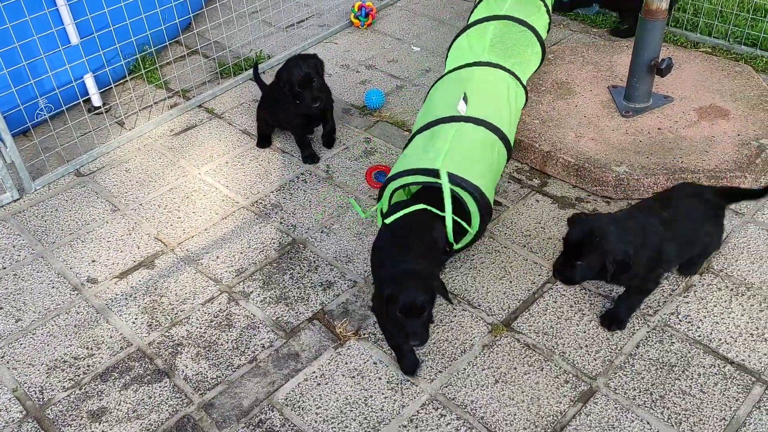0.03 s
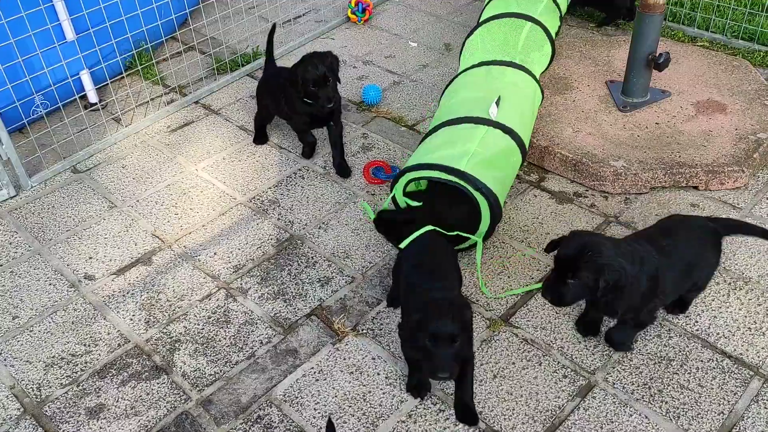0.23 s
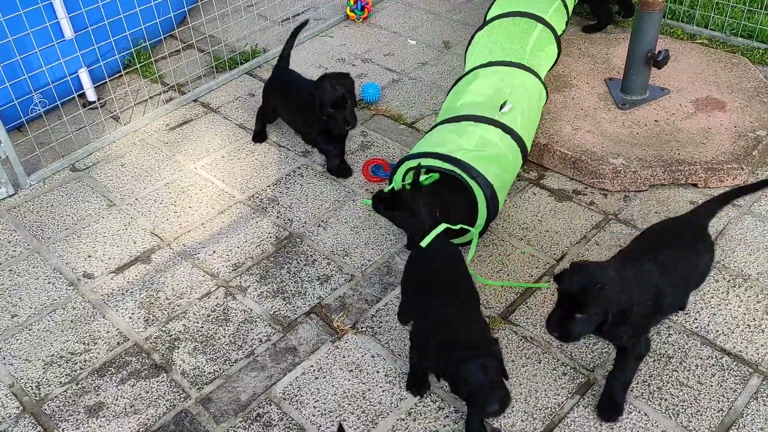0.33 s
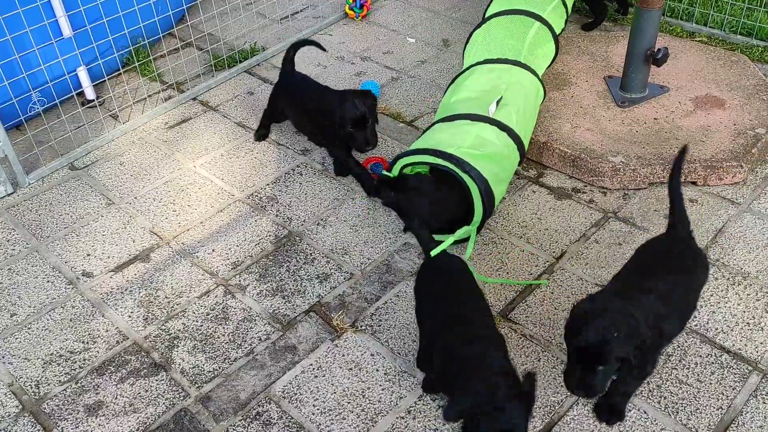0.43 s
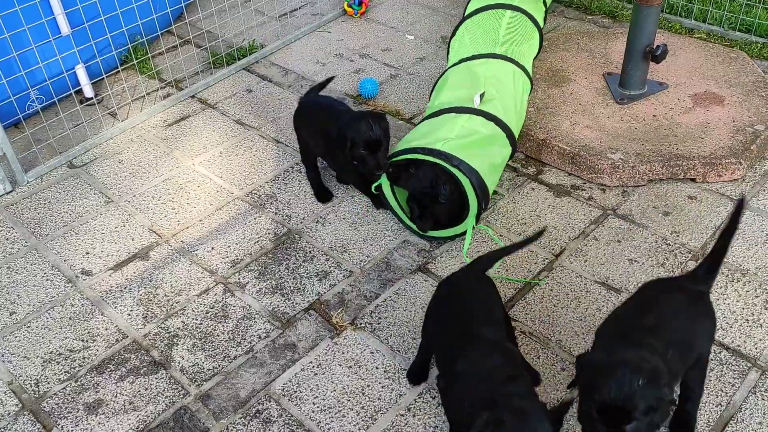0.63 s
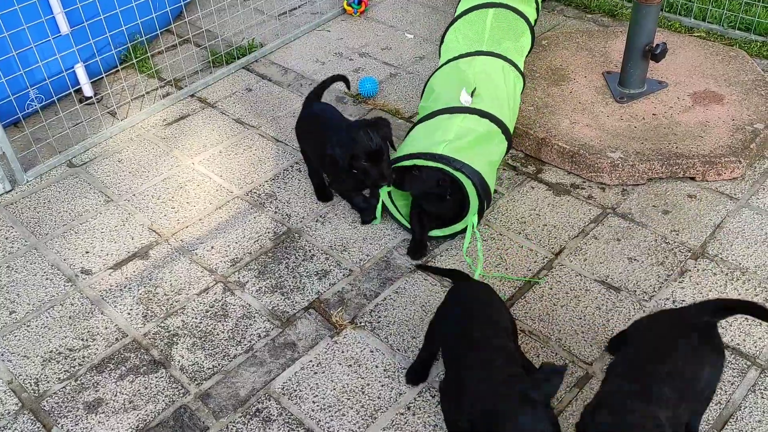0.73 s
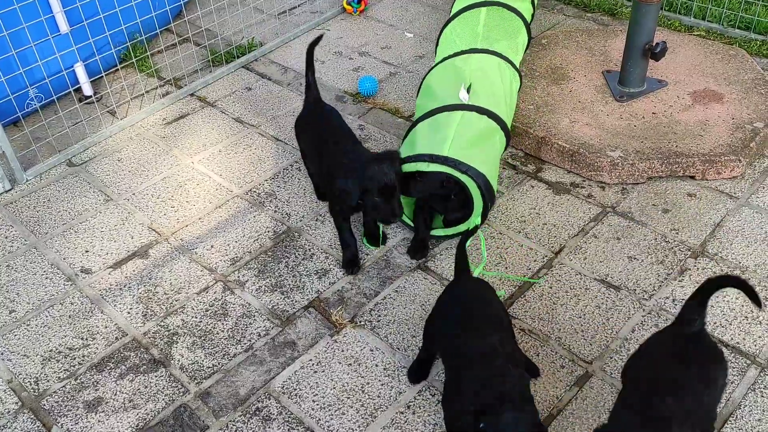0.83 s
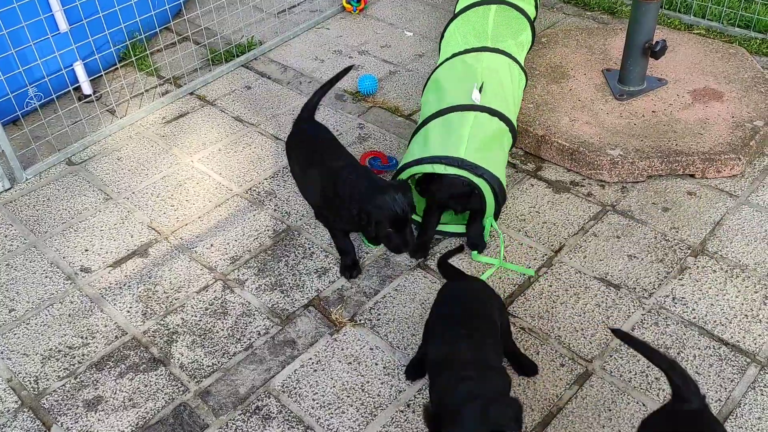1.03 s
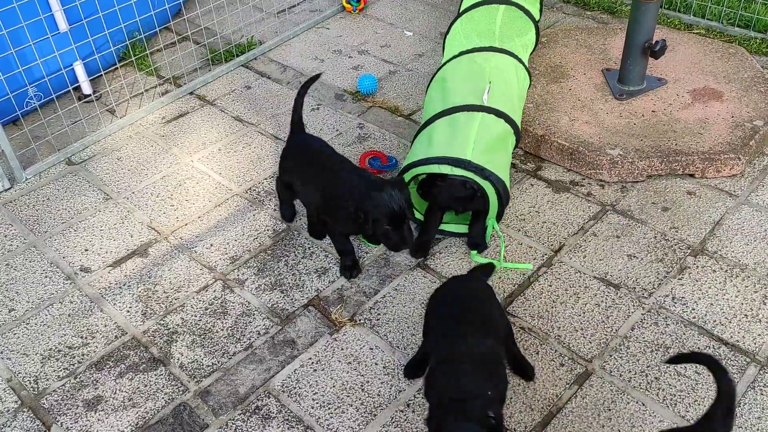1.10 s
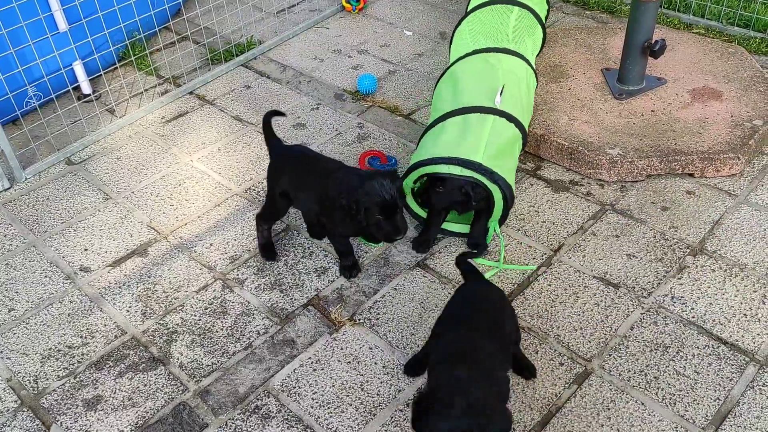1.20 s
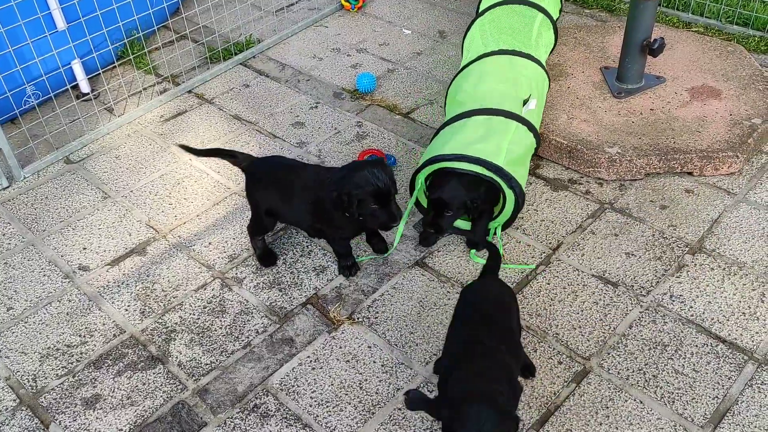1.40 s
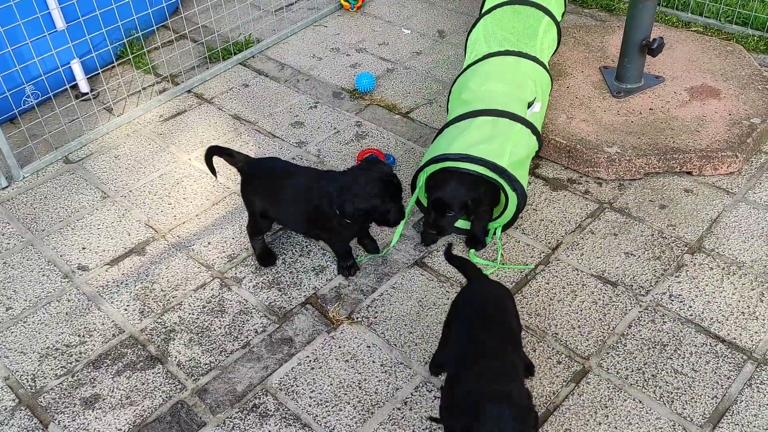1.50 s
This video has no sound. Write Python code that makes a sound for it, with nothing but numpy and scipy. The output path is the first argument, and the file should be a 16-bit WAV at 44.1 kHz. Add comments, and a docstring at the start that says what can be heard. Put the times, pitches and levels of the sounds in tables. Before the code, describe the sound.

A fabric play tunnel rustles close by as puppies scramble out, with hollow thumps around 0.2 to 0.3 seconds. The loudest bumps, crinkles and sharp snaps come between 0.5 and 0.7 seconds, followed by claw scratches and a brief rubbing groan near 0.8. From about 0.9, soft knocks and light wind touch the microphone on the right, while paws scuff the paving more quietly. Faint outdoor rumble and hiss continue throughout.

```python
"""A springy fabric play tunnel, with puppies scrambling out of it, close by on a paved patio.
Their bumps thump the taut wall, knock its hoops and set the air in the tube ringing; the stiff cloth
crinkles, snaps and groans. Paws scuff and cloth rustles throughout, over faint far-off rumble and hiss.
Light wind and a few soft knocks reach the two ports of the stereo microphone."""
import sys
import numpy as np
from scipy import signal
from scipy.fft import rfft, irfft, next_fast_len
from scipy.io import wavfile
from scipy.ndimage import uniform_filter1d, map_coordinates

SR = 44100
rng = np.random.default_rng(int(sys.argv[2]) if len(sys.argv) > 2 else 0)


def wrap_up_sound(samples):
    """Save the sound to the file named by the first command line argument, as 16-bit audio."""
    columns = np.atleast_2d(samples).T
    # keep every value between -1 and 1, then stretch to whole-number steps
    tamed = np.clip(columns, -1, 1)
    steps = np.round(tamed * 32767).astype(np.int16)
    wavfile.write(sys.argv[1], SR, steps)


N = 68355
T = np.arange(N) / SR

# distant outdoor rumble and hiss: freq_hz, level_db
AIR_SPECTRUM = [(25, -1.5), (60, 3), (160, -5.5), (300, -6), (700, -24.5), (1500, -35), (4000, -22.5),
                (6000, -30), (7800, -52), (9200, -54), (10200, -51), (15000, -63)]
# its stereo width: freq_hz, side_db
AIR_WIDTH = [(40, -21), (250, -25), (1000, 4.5), (8000, 3)]
# wind on the microphone ports: time_s, left_db, right_db
WIND_GUSTS = [(0, -51, -54.5), (.27, -51, -32), (.42, -72, -52.5), (.7, -63, -41.5), (.98, -42.5, -33.5),
              (1.05, -61, -26), (1.13, -54, -30.5), (1.23, -46.5, -44.5), (1.32, -61, -40),
              (1.42, -50, -39.5), (1.48, -37, -38.5), (1.55, -50, -32.5)]
# wind rumble: freq_hz, level_db
WIND_SPECTRUM = [(15, 2), (40, -3.5), (70, -6), (130, -10), (250, -14.5), (600, -45), (2000, -77)]
# soft knocks beside the right port: start_s, level_db, pitch_hz, decay_s
MIC_KNOCKS = [(0.914, -17.5, 207, 0.0063), (1.012, -28.5, 138, 0.0058), (1.034, -13.5, 160, 0.0055),
              (1.05, -27, 42.5, 0.072), (1.22, -25.5, 56.4, 0.023), (1.223, -41, 228, 0.014)]
# how the ports differ in colour: freq_hz, left_minus_right_db
PORT_COLOUR = [(500, 3.5), (1400, 0), (2600, -1), (3600, 1), (4500, 1), (7400, -1), (8200, 2.5),
               (9000, 9.5), (9800, -1), (11500, -1.5), (14500, 0)]

# stereo width of cloth and paws: freq_hz, side_db
PLAY_WIDTH = [(150, -11), (450, -27), (800, -9.5), (1500, 1.5), (4000, -5), (8000, -2), (14000, 3)]
# running rustle of paws and cloth: time_s, level_db
RUSTLE_CURVE = [(0, -42.5), (.06, -49.5), (.14, -45.5), (.23, -42.5), (.38, -44), (.43, -46.5), (.512, -45),
                (.62, -47), (.73, -50), (.79, -40), (.87, -48.5), (.96, -42.5), (1.05, -45.5), (1.11, -55),
                (1.2, -48.5), (1.32, -51), (1.38, -48), (1.49, -50.5), (1.55, -56)]
# rustle colour: freq_hz, level_db
RUSTLE_SPECTRUM = [(200, -10.5), (700, 3.5), (1300, -6), (2500, -8), (4000, -11), (5500, -7), (7000, 3.5),
                   (8000, 4.5), (9200, -6), (10200, -22), (14000, -27), (16000, -30)]
# a paw scuffs the paving: start_s, level_db, attack_s, decay_s
PAW_SCUFFS = [(0.119, -48.5, 0.0024, 0.045), (0.498, -40.5, 0.02, 0.16), (0.551, -30.5, .005, 0.016),
              (0.660, -46, 0.0075, 0.068), (0.926, -42.5, 0.018, 0.061), (1.063, -40.5, 0.012, 0.033),
              (1.088, -38, 0.0016, 0.023), (1.154, -54, 0.0032, 0.017), (1.181, -54, 0.0024, 0.0049),
              (1.21, -58.5, 0.0043, 0.04), (1.236, -47.5, 0.014, 0.039), (1.346, -46, 0.013, 0.12),
              (1.444, -47, 0.0069, 0.022), (1.473, -44, 0.017, 0.012)]
# grit under a paw: freq_hz, level_db
SCUFF_SPECTRUM = [(200, 5), (500, -2.5), (800, 5.5), (1150, 0.5), (1800, -6), (2700, -3), (4000, -9.5),
                  (7500, -1.5), (10500, -41)]
# a paw taps something hard: start_s, level_db, pitch_hz, decay_s
PAW_TAPS = [(1.154, -41, 1085, 0.0063)]
# a claw scratches the cloth: start_s, level_db, decay_s
CLAW_SCRATCHES = [(0.6921, -21.5, 0.0057), (0.695, -26, 0.0033), (0.7704, -29, 0.0034),
                  (1.241, -39.5, 0.0046)]
# zip of the weave: freq_hz, level_db
SCRATCH_SPECTRUM = [(1000, -11.5), (3800, -27), (4700, 2), (5400, 2), (6300, 12.5), (7100, -6), (8000, 8.5),
                    (9300, -14.5), (11000, -28), (15000, -41)]

# a flank rubs along the wall: start_s, level_db, attack_s, decay_s, pitch_hz, glide_hz_per_s
FLANK_RUBS = [(0.734, -35.5, 0.014, 0.054, 375, 1298), (0.777, -30, 0.0016, 0.014, 560, -2),
              (0.806, -27.5, 0.0098, 0.0055, 452, 5), (0.823, -28.5, 0.003, 0.019, 465.8, -600),
              (0.869, -41, 0.0056, 0.0084, 445, -2), (0.918, -38, 0.023, 0.032, 450, 11),
              (1.392, -49.5, 0.033, 0.031, 684, -150)]
# rasp of fur on the wall: freq_hz, level_db
RASP_SPECTRUM = [(120, -21), (220, -2), (310, 7.5), (450, -3.5), (550, 1.5), (620, -11), (720, 2),
                 (950, -21), (1350, -12), (2500, -30), (5000, -75), (10000, -98)]
# the stiff cloth buckles: start_s, level_db, attack_s, decay_s
CLOTH_CRINKLES = [(0.186, -39.5, 0.00074, 0.01), (0.456, -39.5, 0.0015, 0.011), (0.517, -33, 0.0013, 0.015),
                  (0.5397, -24.5, 0.0029, 0.019), (0.5507, -19, 0.0088, 0.0069),
                  (0.561, -24, 0.0033, 0.0063), (0.573, -34, 0.014, 0.012), (0.607, -16.5, 0.0044, 0.006),
                  (0.6251, -25, 0.00082, 0.00077), (0.666, -34.5, 0.0016, 0.011),
                  (0.826, -33.5, 0.0015, 0.0091), (0.899, -37, 0.00075, 0.0096),
                  (1.091, -33.5, 0.0025, 0.023)]
# buckling clicks: freq_hz, level_db
CRINKLE_SPECTRUM = [(500, -7.5), (1500, -12), (2700, -7.5), (3500, -16.5), (4600, -5.5), (6200, -1),
                    (7800, 5), (9000, -5.5), (10300, -22), (11500, -27.5), (14000, -29), (16000, -47)]
# a crease snaps: start_s, level_db, ping_hz, left_minus_right_db
CREASE_SNAPS = [(0.187, -30.5, 7800, 5), (0.517, -31.5, 7500, 8), (0.544, -24, 8000, 11),
                (0.5467, -17, 7100, 1), (0.5568, -14, 6070, 5), (0.5616, -8.5, 7640, 0),
                (0.5638, -15, 7500, 2), (0.6089, -15, 6200, -3), (0.6141, -8, 6930, -2.5),
                (0.616, -14, 9030, -2), (0.6678, -24.5, 6960, -3), (0.6736, -22.5, 7300, 2.5),
                (0.6928, -30.5, 5360, -6), (0.7707, -28.5, 5400, 7), (0.9, -31, 8100, 3),
                (1.059, -37, 7500, 1.5)]
# a spring hoop is knocked: start_s, level_db, pitch_hz, decay_s
HOOP_HITS = [(0.210, -44, 797, 0.01), (0.226, -30, 749, 0.0099), (0.304, -23.5, 696, 0.011),
             (0.590, -20.5, 716, 0.017), (0.652, -36, 648, 0.025), (0.682, -38, 673, 0.0079),
             (0.834, -32.5, 704, 0.021), (1.094, -29.5, 689, 0.01), (1.098, -37, 791, 0.019),
             (1.448, -45, 697, 0.01)]
# modes of a hoop: pitch_ratio, level_db, decay_ratio
HOOP_MODES = [(0.692, -9.5, 1.1), (0.998, -0.5, 1), (1.179, -7, .6), (1.5, -18, 1.1), (1.84, -15, .7)]
# air modes of the tube: pitch_hz, level_db, t60_s (capped in tube_air)
TUBE_MODES = [(183, 4.5, 0.13), (209.4, 1.5, 0.32), (296, -4, 0.1), (340.2, 3, 0.27), (418, -5.5, 0.28),
              (493, -17, 0.23), (656, 5, 0.15), (700, -9, 0.39), (1020, -6, 0.27)]
# a body bumps the wall: start_s, thump_db, pitch_hz, overtone_re_thump_db, flap_db, decay_s
WALL_BUMPS = [(0.12, -34.5, 249.6, -28, -44, 0.012), (0.208, -26.5, 299, -10, -35, 0.008),
              (0.221, -30.5, 270, 2.5, -31, 0.0085), (0.236, -28.5, 237.4, -6, -37.5, 0.012),
              (0.295, -31, 210, -16, -30.5, 0.015), (0.302, -23.5, 219.5, -12, -41, 0.019),
              (0.346, -37.5, 202.2, 2, -67, 0.024), (0.458, -40, 294.5, -13.5, -41.5, 0.02),
              (0.494, -24, 309, -28, -37, 0.0087), (0.577, -21.5, 292.4, -14, -21, 0.017),
              (0.587, -22.5, 308, -6, -22.5, 0.011), (0.593, -35.5, 215, -14, -53, 0.018),
              (0.64, -26.5, 307, -29, -41, 0.016), (0.651, -41.5, 178, -20, -61, 0.019),
              (0.687, -41.5, 322.7, 0, -61, 0.022), (0.776, -34, 282, 10, -30.5, 0.012),
              (1.030, -41, 344, -15, -47, 0.011), (1.102, -35.5, 322, -13, -35, 0.011),
              (1.205, -45, 230, -1, -47, 0.0085), (1.357, -38, 181, -8.5, -66, 0.0036)]
# dull flap of shaken cloth: freq_hz, level_db
FLAP_SPECTRUM = [(100, -20.5), (170, -6.5), (260, 2), (430, 3.5), (560, -1), (740, -2), (1000, -8.5),
                 (1400, -10), (2200, -17.5), (3500, -19.5), (7000, -24), (11000, -71)]

WALL_PAN_DB = 1.5  # the wall sits slightly left


def from_db(db):
    """Decibels to gain."""
    return 10 ** (np.asarray(db) / 20)


def rms_one(x):
    """Scale to rms 1."""
    return x / np.sqrt(np.mean(x ** 2) + 1e-20)


def in_time(rows):
    """Join the rows of a curve by straight lines."""
    times, *columns = np.transpose(rows)
    return np.array([np.interp(T, times, column) for column in columns])


def pan(db):
    """Left and right gains for a left-minus-right level."""
    return from_db(np.array([[db], [-db]]) / 2)


def colour(x, spectrum, keep_power=True):
    """Causal (minimum-phase) filter through (freq_hz, level_db) points."""
    size = 2 * next_fast_len(N)
    hz, db = np.transpose(spectrum)
    bin_hz = np.arange(size // 2 + 1) * SR / size
    gain = from_db(np.interp(np.log(bin_hz + 1), np.log(hz), db))
    cepstrum = irfft(np.log(rms_one(gain) if keep_power else gain))
    cepstrum[1:size // 2] *= 2
    cepstrum[size // 2 + 1:] = 0
    return irfft(rfft(x, size) * np.exp(rfft(cepstrum)))[..., :N]


def resonate(x, hz, width_hz):
    """One resonance with gain 1 at its peak."""
    r = np.exp(-np.pi * width_hz / SR)
    feedforward = np.array([1, 0, -1]) * (1 - r * r) / 2
    feedback = [1, -2 * r * np.cos(2 * np.pi * hz / SR), r * r]
    return signal.lfilter(feedforward, feedback, x + 1e-18)


def swell(start, attack, decay):
    """A straight rise, then an exponential fall."""
    return np.clip((T - start) / attack, 0, 1) * np.exp(-np.maximum(T - start - attack, 0) / decay)


def ring(start, hz, attack, decay):
    """The damped swings of something struck."""
    return swell(start, attack, decay) * np.sin(2 * np.pi * hz * (T - start))


def wander(samples):
    """Random drift, smoothed over so many samples; rms 1."""
    return rms_one(uniform_filter1d(rng.standard_normal(N), size=samples))


def widen(pair, width):
    """Two unrelated signals, as mid and side, become left and right."""
    side = colour(pair[1], width, keep_power=False)
    return (pair[0] + side * np.array([[1], [-1]])) / np.sqrt(2)


def grains(envelope, per_s, spread_db):
    """A stereo spray of tiny clicks of uneven size, following an envelope."""
    sizes = from_db(spread_db * np.minimum(rng.exponential(1, (2, N)), 4))
    signs = rng.choice([-1, 1], (2, N))
    fires = rng.random((2, N)) < per_s / SR
    return widen(envelope * rms_one(sizes * signs * fires), PLAY_WIDTH)


def outdoor_air(level_db=-51.5):
    """Steady rumble and hiss from far off."""
    return from_db(level_db) * colour(widen(rng.standard_normal((2, N)), AIR_WIDTH), AIR_SPECTRUM)


def microphone_wind():
    """Wind rumbles in each port on its own."""
    return from_db(in_time(WIND_GUSTS)) * colour(rng.standard_normal((2, N)), WIND_SPECTRUM)


def microphone_knocks(attack_s=0.0019, left_db=-50):
    """Soft knocks land beside the right port and barely reach the left."""
    knocks = sum(from_db(db) * ring(start, hz, attack_s, decay) for start, db, hz, decay in MIC_KNOCKS)
    return knocks * from_db([[left_db], [0]])


def patio(x, level_db=-14.5, delay_s=0.0021, t60_s=0.3):
    """A short, weak scatter comes back from paving, pool and walls."""
    tail = rng.standard_normal((2, N)) * swell(delay_s, delay_s, t60_s / np.log(1000))
    return from_db(level_db) * signal.fftconvolve(x, rms_one(tail) / np.sqrt(N), axes=1)[:, :N]


def rustle(flicker_db=1.5):
    """Fine grains from paws on the paving and shifting cloth."""
    level = from_db(in_time(RUSTLE_CURVE) + flicker_db * wander(samples=500))
    return colour(grains(level, per_s=7000, spread_db=0.5), RUSTLE_SPECTRUM) * pan(db=1)


def paw_scuffs():
    """Pads and claws drag briefly over gritty stone."""
    drag = sum(from_db(db) * swell(start, attack, decay) for start, db, attack, decay in PAW_SCUFFS)
    return colour(grains(drag, per_s=1800, spread_db=1.5), SCUFF_SPECTRUM)


def paw_tap(attack_s=0.0018):
    """A paw strikes something small and hard: a light, dry tock."""
    return sum(from_db(db) * ring(start, hz, attack_s, decay) for start, db, hz, decay in PAW_TAPS)


def claw_scratches(attack_s=0.00048):
    """Thin, very short zips of a claw across the weave."""
    drag = sum(from_db(db) * swell(start, attack_s, decay) for start, db, decay in CLAW_SCRATCHES)
    return colour(grains(drag, per_s=8300, spread_db=2.5), SCRATCH_SPECTRUM)


def groan(start, hz, glide_hz_per_s, glide_s=0.053, waver_hz=50.1):
    """The rubbed wall's rough note wavers with the slips and slides as the cloth stretches."""
    slide = glide_hz_per_s * np.clip(T - start, 0, glide_s)
    pitch = hz + slide + waver_hz * wander(samples=150)
    return np.sqrt(2) * np.sin(2 * np.pi * np.cumsum(pitch) / SR)


def flank_rubs(rasp_db=-0.5):
    """Fur sticks and slips on the wall, which answers with a hollow groan and a broad rasp."""
    groans = pressure = 0
    for start, db, attack, decay, hz, glide in FLANK_RUBS:
        stroke = from_db(db) * swell(start, attack, decay)
        groans += stroke * groan(start, hz, glide)
        pressure += stroke
    slips = grains(1, per_s=2700, spread_db=1.0)
    rasp = from_db(rasp_db) * colour(pressure * slips, RASP_SPECTRUM)
    return (groans + rasp) * pan(WALL_PAN_DB)


def cloth_crinkles():
    """The stiff cloth buckles in bursts of bright clicks."""
    strain = sum(from_db(db) * swell(start, attack, decay) for start, db, attack, decay in CLOTH_CRINKLES)
    return colour(grains(strain, per_s=10000, spread_db=1.5), CRINKLE_SPECTRUM)


def crease_snaps(click_db=0.5):
    """Single creases give way, each with a click and a brief ping of its own."""
    clicks, pings = np.zeros((2, 2, N))
    for start, db, hz, pan_db in CREASE_SNAPS:
        gains = from_db(db) * pan(pan_db)
        clicks[:, int(start * SR)] += from_db(click_db) * gains[:, 0]
        pings += gains * ring(start, hz, attack=0.00017, decay=0.0011)
    return colour(clicks, CRINKLE_SPECTRUM) + pings


def hoop_knocks(attack_s=0.0018):
    """Each knocked hoop gives a short hollow note, pitched and damped by how it is bent and held."""
    notes = sum(from_db(db + mode_db) * ring(start, hz * pitch_ratio, attack_s, decay * decay_ratio)
                for start, db, hz, decay in HOOP_HITS
                for pitch_ratio, mode_db, decay_ratio in HOOP_MODES)
    return notes * pan(db=-2.0)


def tube_air(wall, longest_t60_s=0.25):
    """The air in the tunnel rings on briefly after each bump."""
    return sum(from_db(db) * resonate(wall, hz, width_hz=np.log(1000) / (np.pi * min(t60, longest_t60_s)))
               for hz, db, t60 in TUBE_MODES)


def wall_bumps(overtone_ratio=1.58, thump_attack_s=0.0034, flap_attack_s=0.0036):
    """Each bump swings the taut wall like a drumhead and shakes a dull flap out of the cloth."""
    thumps = shake = 0
    for start, thump_db, hz, overtone_db, flap_db, decay in WALL_BUMPS:
        fundamental = ring(start, hz, thump_attack_s, decay)
        overtone = from_db(overtone_db) * ring(start, hz * overtone_ratio, thump_attack_s, decay)
        thumps += from_db(thump_db) * (fundamental + overtone)
        shake += from_db(flap_db) * swell(start, flap_attack_s, decay)
    wall = thumps + colour(grains(shake, per_s=2400, spread_db=2.0), FLAP_SPECTRUM)
    return (wall + tube_air(wall)) * pan(WALL_PAN_DB)


def scene():
    """Tunnel and puppies on the patio, open air behind them, wind and knocks at the microphone."""
    tunnel = wall_bumps() + hoop_knocks() + flank_rubs() + cloth_crinkles() + crease_snaps()
    play = tunnel + claw_scratches() + paw_scuffs() + paw_tap() + rustle()
    return play + patio(play) + outdoor_air() + microphone_wind() + microphone_knocks()


def record(dry):
    """Each port adds its own colour, sound reaches the left a little later, and the top is cut steeply."""
    left_lag_s, cutoff_hz = 0.00003, 15500
    left = colour(dry[0], [(hz, db / 2) for hz, db in PORT_COLOUR], keep_power=False)
    right = colour(dry[1], [(hz, -db / 2) for hz, db in PORT_COLOUR], keep_power=False)
    left = map_coordinates(left, [(T - left_lag_s) * SR], order=5, mode="nearest")
    lowpass = signal.butter(12, cutoff_hz, fs=SR, output="sos")
    return signal.sosfiltfilt(lowpass, np.array([left, right]))


dry = scene()
out = record(dry)
wrap_up_sound(out)
```